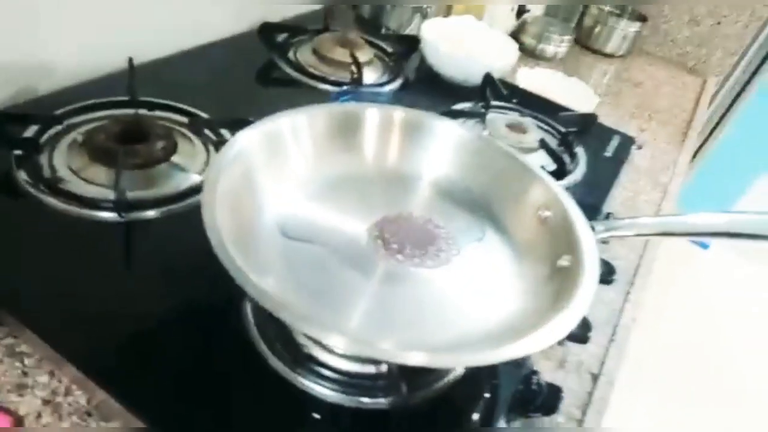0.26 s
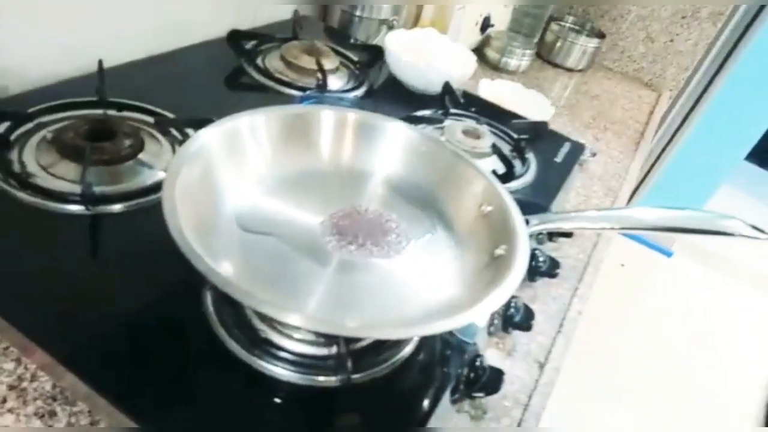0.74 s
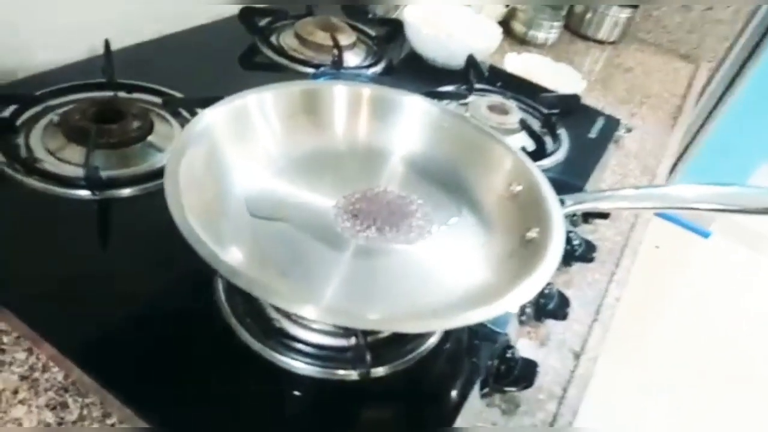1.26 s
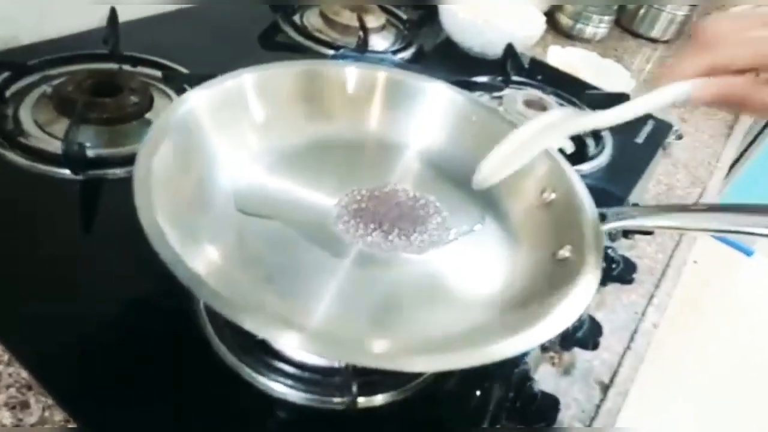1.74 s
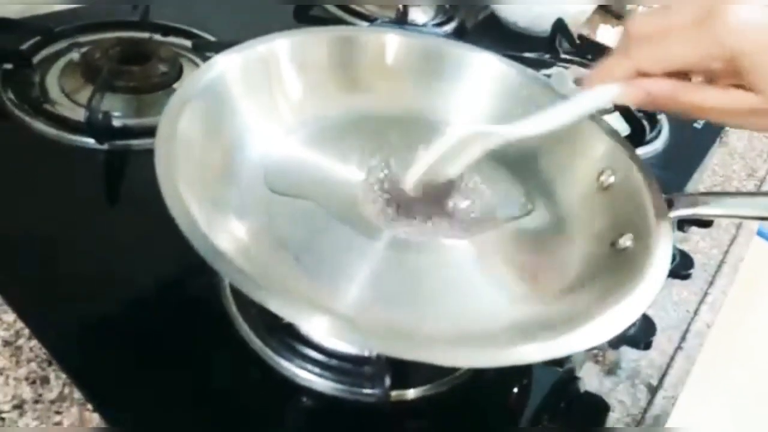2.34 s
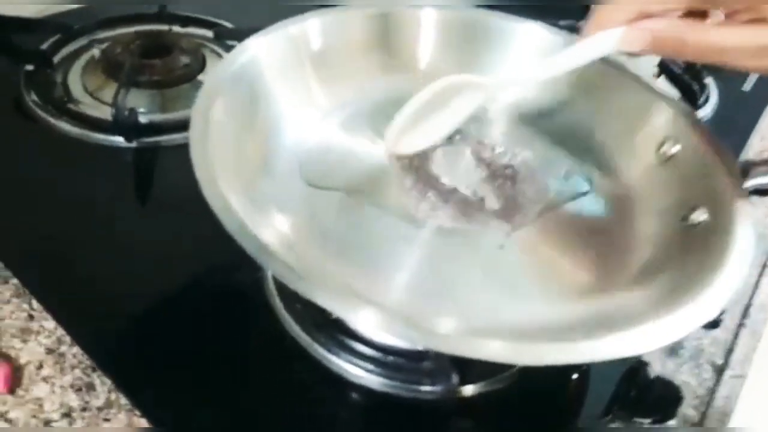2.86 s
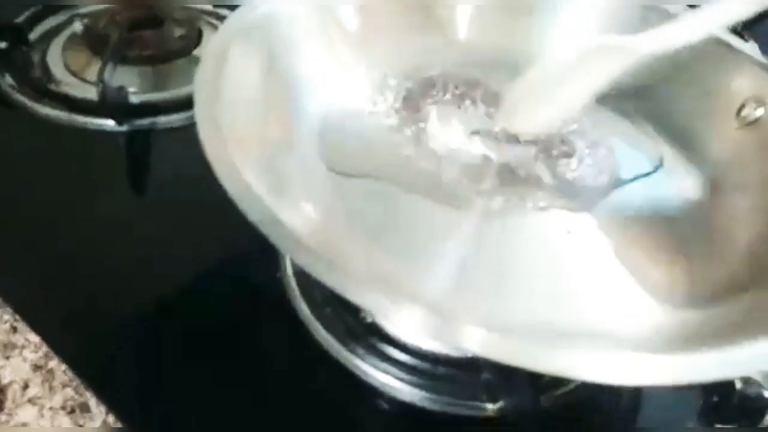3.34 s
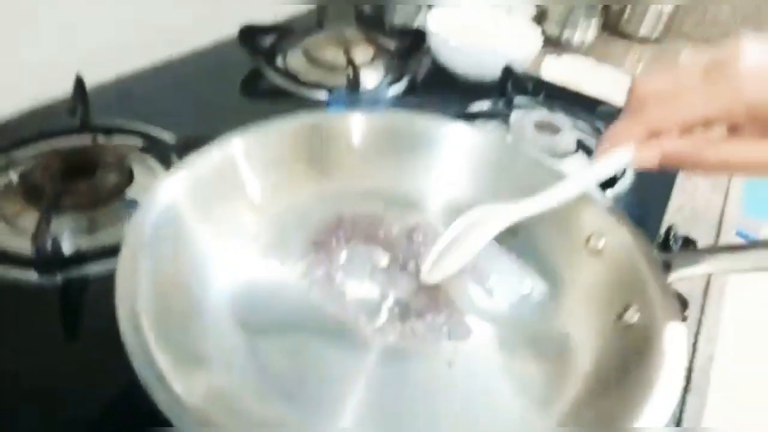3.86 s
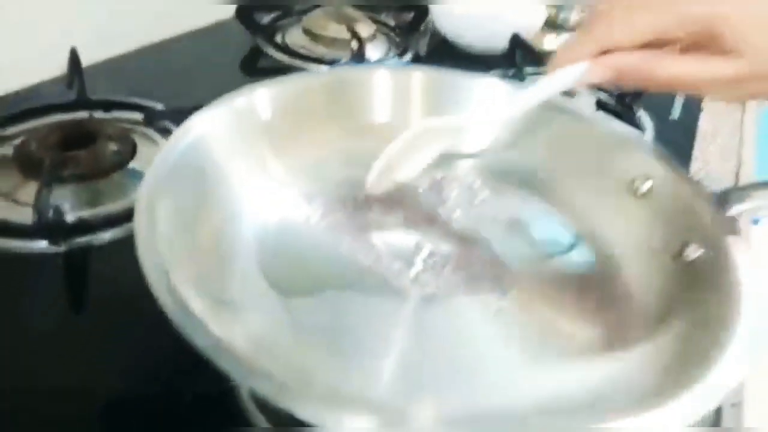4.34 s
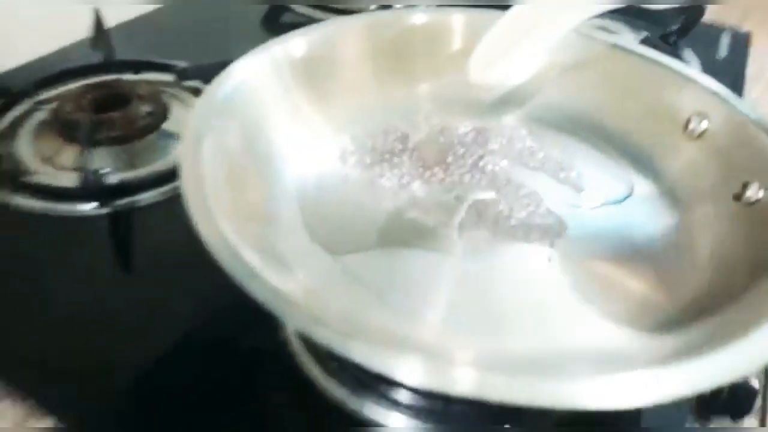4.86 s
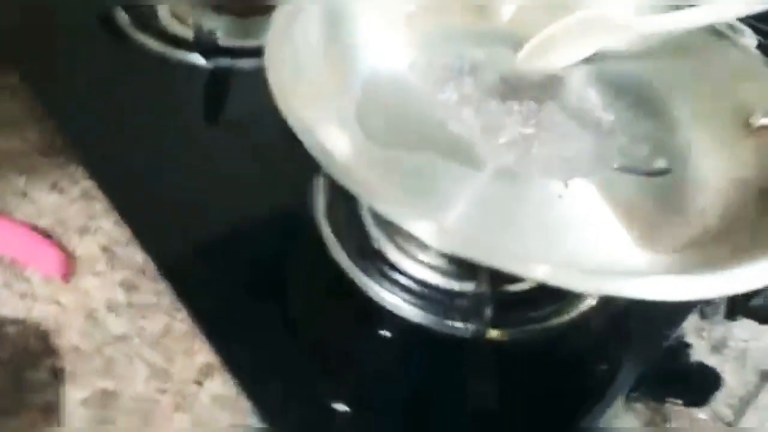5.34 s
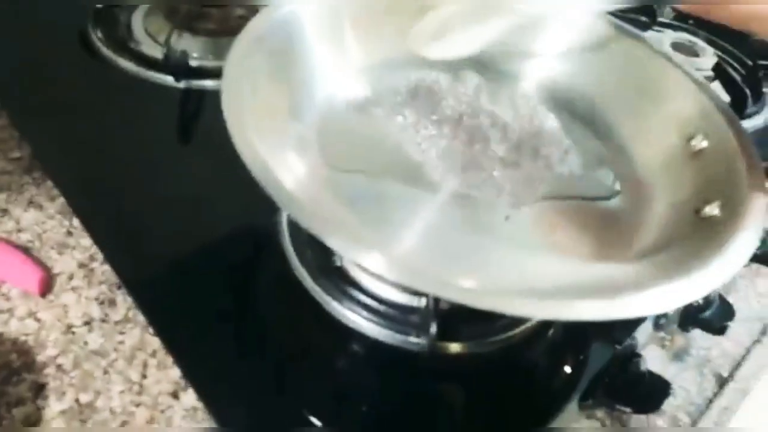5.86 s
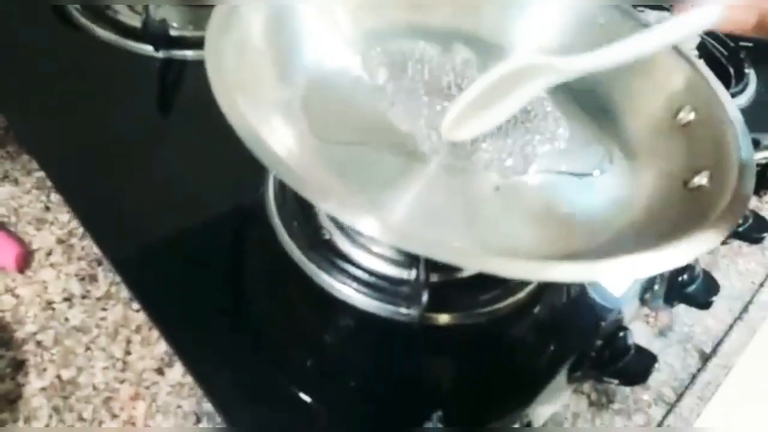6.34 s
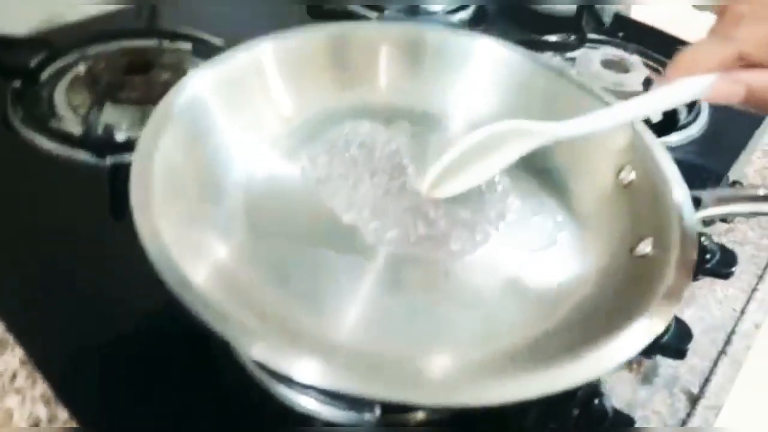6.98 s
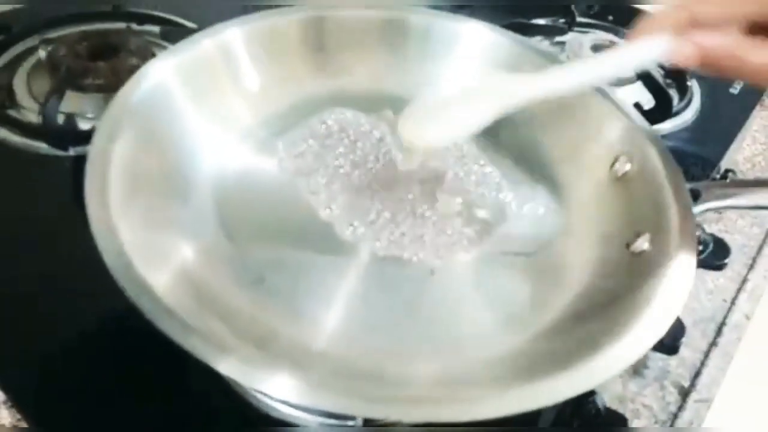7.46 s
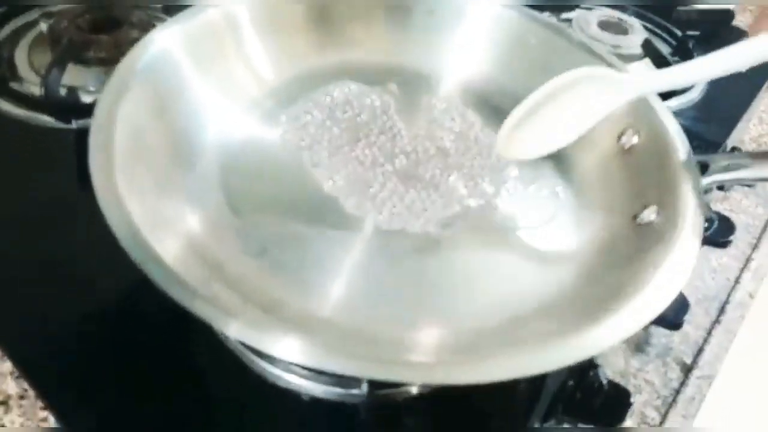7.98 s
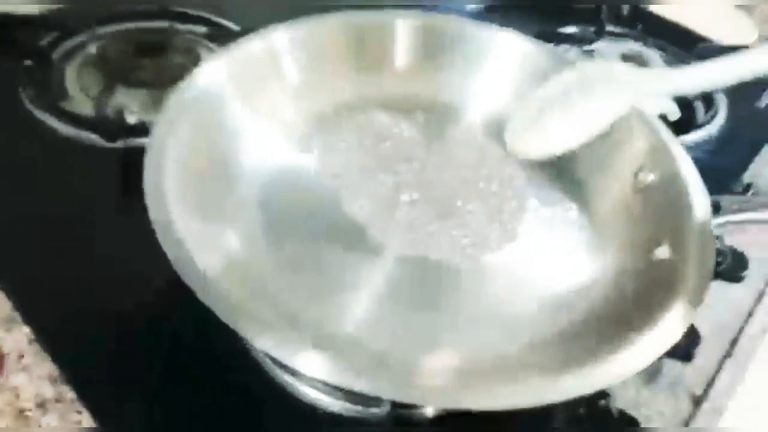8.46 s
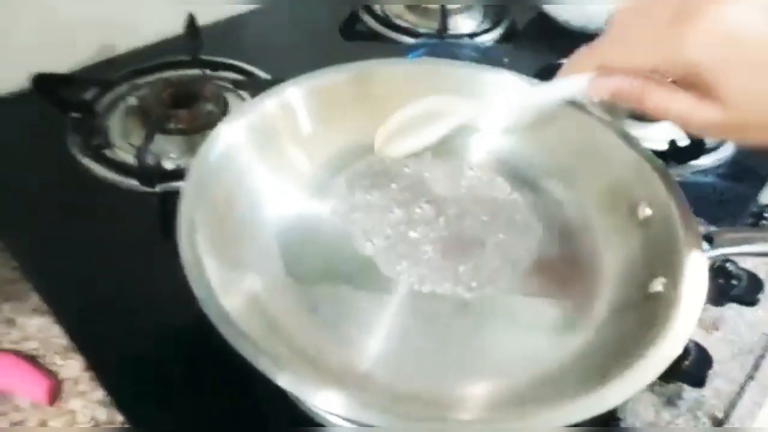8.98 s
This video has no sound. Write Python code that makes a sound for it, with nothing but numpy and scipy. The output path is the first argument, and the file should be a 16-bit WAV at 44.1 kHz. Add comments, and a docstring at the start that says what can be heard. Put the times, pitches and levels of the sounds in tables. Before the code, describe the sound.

Oil fizzes faintly in a steel pan over the low rumble of a gas flame. A utensil clatters briefly on the counter. Then a spoon starts stirring, with short ringing knocks and gritty scrapes, and the sizzle livens as seeds burst with sharp snaps. Toward the end the stirring stops and the frying settles. The pan is close to the microphone in a small, slightly echoing kitchen.

```python
"""Mustard seeds fizz and pop in a little hot oil in a steel pan, over a rumbling gas flame in a small
kitchen. Early on, a utensil clatters on the counter. From about 2 to 8 seconds a spoon stirs: it knocks
on the pan, drags over it and makes the oil crackle harder. From about 4 seconds, faint tones ring now
and then. Near the end a flying droplet ticks on the left microphone port (its sound opening), and a hand
shifts on the microphone with a soft rumble."""
import sys
import numpy as np
from scipy import signal
from scipy.fft import rfft, irfft
from scipy.io import wavfile
from scipy.ndimage import uniform_filter1d

SR = 44100
rng = np.random.default_rng(int(sys.argv[2]) if len(sys.argv) > 2 else 0)


def digitize_waveform(pressure):
    """Quantize a signal to 16-bit integers and store it at the path in sys.argv[1].

    Rows of a 2-D input are taken as channels; values are limited to [-1, 1].
    """
    field = np.atleast_2d(pressure).T
    bounded = np.clip(field, -1, 1)
    quanta = np.round(bounded * 32767).astype(np.int16)
    wavfile.write(sys.argv[1], SR, quanta)


N = 406161
TIME = np.arange(N) / SR


def from_db(db):
    """Turn decibels into a number to multiply a sound by."""
    return np.exp(np.asarray(db) * (np.log(10) / 20))


def rms_one(x):
    """Scale a signal so that its average level (rms) is 1."""
    return x / np.sqrt(np.mean(x ** 2) + 1e-20)


def unit_energy(x):
    """Scale each channel so that its squared samples add up to 1."""
    return x / np.sqrt(np.sum(x ** 2, axis=-1, keepdims=True))


def in_time(rows):
    """Join (time_s, value) points with straight lines."""
    return np.interp(TIME, *np.transpose(rows))


def sides(lean_db):
    """Share a sound between left and right; above 0 dB it leans left."""
    ratio = from_db(np.atleast_1d(lean_db))
    return np.array([ratio, np.ones_like(ratio)]) * np.sqrt(2 / (1 + ratio ** 2))


def from_the_right(x, lag_s):
    """A sound on the right reaches the left side a little later."""
    return np.array([np.interp(TIME - lag_s, TIME, x[0]), x[1]])


def dying(fade_s):
    """A fade-out. Everywhere here, fade_s is the time to fall by 60 dB."""
    return from_db(-60 * TIME[:max(int(fade_s * SR), 8)] / fade_s)


def swell(sound, rise_s):
    """Ease a sound in."""
    return sound * (1 - np.exp(-TIME[:sound.shape[-1]] / rise_s))


def add(track, start_s, sound):
    """Mix a sound into a track at the given time."""
    at = max(round(start_s * SR), 0)
    track[..., at:at + sound.shape[-1]] += sound[..., :N - at]


def drift(turns_per_s):
    """A curve that wanders at random, with a typical size of 1."""
    points = rng.standard_normal(int(N / SR * turns_per_s) + 2)
    return rms_one(np.interp(TIME * turns_per_s, np.arange(len(points)), points))


def noise(alike, size=N):
    """Stereo white noise; alike runs from 0 (unrelated sides) to 1 (the same on both)."""
    mid, side = rng.standard_normal((2, size))
    return (np.sqrt(1 + alike) * mid + np.sqrt(1 - alike) * np.array([side, -side])) / np.sqrt(2)


def through(x, response):
    """Play a sound through an object or room, given its response to one click."""
    convolve = signal.oaconvolve if x.shape[-1] == N else signal.fftconvolve
    return convolve(np.atleast_2d(x), np.atleast_2d(response), axes=-1)[:, :N]


def band(x, low_hz, high_hz):
    """Keep the part of a sound between two pitches."""
    return signal.sosfilt(signal.butter(2, [low_hz, high_hz], "band", fs=SR, output="sos"), x + 1e-18)


def colour(x, spectrum, size=4096):
    """Shape a sound's bass and treble to follow (pitch_hz, level_db) points."""
    hz, db = np.transpose(spectrum)
    grid_hz = np.maximum(np.arange(size // 2 + 1) * SR / size, 1)
    gains = from_db(np.interp(np.log(grid_hz), np.log(hz), db))
    # minimum phase: the filter never rings before the sound arrives
    cepstrum = irfft(np.log(gains))
    cepstrum[1:size // 2] *= 2
    cepstrum[size // 2 + 1:] = 0
    return through(x, unit_energy(irfft(np.exp(rfft(cepstrum)))))


def ringing(modes, spread):
    """An object's own notes (modes) fade away; spread puts left and right out of step."""
    longest_s = max(fade_s for _, _, fade_s in modes)
    out = np.zeros((2, int(longest_s * SR) + 8))
    for hz, db, fade_s in modes:
        fall = dying(fade_s)
        phase = 2 * np.pi * hz * TIME[:len(fall)] + spread * rng.normal(size=(2, 1))
        out[:, :len(fall)] += from_db(db) * fall * np.sin(phase)
    return out


def contact(fade_s, crack_db, crack_fade_s, rise_s):
    """The force of a blow: it builds up to a crack, then chatters away."""
    fall = dying(max(fade_s, crack_fade_s))
    crack = dying(crack_fade_s)
    fall[:len(crack)] += from_db(crack_db) * crack
    return swell(fall, rise_s) * noise(0.3, size=len(fall))


def kitchen(x):
    """The tiled room gives a blurred echo; the treble dies sooner."""
    tail = np.zeros((2, N))
    bands = [(61, 936, .5, .57), (1194, 2840, .52, .17), (2310, 16500, .37, 0)]
    for low_hz, high_hz, fade_s, alike in bands:
        fall = dying(fade_s)
        add(tail, .006, band(fall * noise(alike, size=len(fall)), low_hz, high_hz))
    return through(x, unit_energy(tail[:, :SR]))


# the flame's tone colour: pitch_hz, level_db
FLAME_COLOUR = [(20, -14), (50, -10.5), (105, 4), (170, 1.5), (260, -4.5), (400, -9.5), (750, -11),
                (1100, -15), (3000, -30.5)]
# how loud the flame is: time_s, level_db
FLAME_LEVEL = [(0, -63.5), (1.9, -62), (2.8, -57.5), (6.5, -59.5), (7.6, -61), (8.5, -60.5), (8.75, -64),
               (9.2, -61.5)]
def flame():
    """The gas burns with a low, flickering rumble."""
    return colour(noise(0.71), FLAME_COLOUR) * from_db(in_time(FLAME_LEVEL) + 1.5 * drift(12))


# how loud the hand's rumble is: time_s, level_db
HAND_LEVEL = [(8.5, -80), (8.65, -56), (8.85, -59), (9.0, -86)]
def hand():
    """A hand shifts on the microphone and makes it rumble."""
    return rms_one(band(noise(0.92), 41, 147)) * from_db(in_time(HAND_LEVEL))


# faint ringing tones: start_s, pitch_hz, level_db, fade_s
FAINT_TONES = [(3.905, 725, -50.5, 1.4), (4.67, 721, -41.5, 1.3), (5.541, 1054, -52.5, 1.9),
               (5.69, 1360, -60, 1.1), (6.252, 1073, -51, 0.97), (7.2, 1343, -48.5, 0.96),
               (8.04, 818, -48.5, 0.78)]
def tones():
    """Faint tones ring on, waver and fade."""
    out = np.zeros((2, N))
    for start_s, hz, db, fade_s in FAINT_TONES:
        add(out, start_s, swell(ringing([(hz, db, fade_s)], spread=.5), rise_s=.02))
    return out * (.8 + .45 * drift(28))


# the notes of the microphone port: pitch_hz, level_db, fade_s
PORT_MODES = [(3080, -8, 0.012), (3920, -0.5, 0.0024), (5600, 7, 0.0031)]
def droplet(start_s=8.5332):
    """A drop hits the left port, which rings so briefly that it makes one dry tick."""
    out = np.zeros((2, N))
    add(out, start_s, from_db(-13.5) * ringing(PORT_MODES, spread=0.13) * sides(24))
    return band(out, 1550, 12500)


# the low notes of the stove under the pan: pitch_hz, level_db, fade_s
STOVE_MODES = [(94, -4, 0.1), (138.4, -12.5, 0.43), (169, -10.5, 0.15), (224, 3.5, 0.042),
               (277.5, 4.5, 0.067), (329.5, 0, 0.096)]
def stove(force):
    """Blows travel into the stove, which thuds almost alike on both sides."""
    thud = swell(ringing(STOVE_MODES, spread=0.143), rise_s=0.006)
    return through(force.mean(axis=0), unit_energy(thud))


# each time the utensil touches the counter: start_s, level_db, treble_db, chime_db
BOUNCES = [(0.5907, -13, 3.5, -44), (0.5967, -13.5, 2, -57), (0.602, -14.5, 0, -61), (0.6101, -16, -1, -55),
           (0.6186, -40, 3, -60), (0.659, -24, 16.5, -39), (0.661, -32, 10, -42), (.677, -30, 4, -54),
           (0.68, -28, 2, -44.5), (0.802, -8.5, -1, -33), (0.806, -7.5, 8.5, -50), (0.817, -15, 1, -45),
           (.8245, -9, -1, -52), (0.829, -12.5, 4, -50), (0.8377, -11.5, -11, -45), (.844, -13.5, -8, -55),
           (1.677, -34.5, -6, -55)]
# the utensil's notes: pitch_hz, level_db, fade_s
UTENSIL_MODES = [(225.1, -4.5, 0.44), (553, -0.5, 0.12), (877, -5.5, 0.6), (1200, 1, 0.22), (1454, 4, 0.18),
                 (1798, -17, 0.58), (1927, -6, 0.25), (2115, 5, 0.09), (2350, -9, 0.19), (2331, 6, 0.12),
                 (2772, -3, 0.28), (3728, -2.5, 0.26), (4920, 5, 0.034), (6940, 1, 0.041)]
# tone colours of the clatter's body and its bright top: pitch_hz, level_db
BODY_COLOUR = [(60, -25), (130, -11), (220, -14), (380, -17), (620, -1.5), (1400, 2), (2200, 2.5),
               (2900, -4.5), (3500, -15), (5000, -14), (9000, -37)]
TOP_COLOUR = [(2000, -24), (3700, 19), (5000, 5), (6700, 9), (8200, -9.5), (11000, -6), (13500, -43)]
def clatter(chime_above_hz=3200):
    """Each bounce cracks and rings the hollow utensil; its tip chimes and the stove thuds along."""
    blows, treble, taps, tips = np.zeros((4, 2, N))
    for start_s, db, treble_db, chime_db in BOUNCES:
        force = contact(.027, crack_db=6, crack_fade_s=0.007, rise_s=0.0005)
        blow = from_db(db + 13.5) * unit_energy(force)
        add(blows, start_s - .0005, blow)
        add(treble, start_s - .0005, from_db(treble_db - 8.5) * blow)
        add(taps, start_s, from_db([db]))
        add(tips, start_s, from_db([chime_db]))
    body_modes = [mode for mode in UTENSIL_MODES if mode[0] < chime_above_hz]
    tip_modes = [mode for mode in UTENSIL_MODES if mode[0] >= chime_above_hz]
    ring = from_db(-28) * through(taps, ringing(body_modes, spread=0.1))
    chime = through(tips, ringing(tip_modes, spread=0.72))
    body = from_the_right(colour(blows, BODY_COLOUR) + ring, lag_s=0.00036)
    return body + colour(treble, TOP_COLOUR) + chime + from_db(-17.5) * stove(blows)


def touched(modes):
    """Each place the spoon touches changes the pitch and strength of the pan's notes a little."""
    return [(hz * (1 + .008 * rng.normal()), db + 2.5 * rng.normal(), fade_s)
            for hz, db, fade_s in modes]


# the pan's lowest notes, the main one first: pitch_hz, level_db, fade_s
BOTTOM_MODES = [(885, 0, 0.095), (855, -6, 0.055), (935, -7, 0.05), (1575, -20, 0.05)]
def bottom_knock(pitch_hz):
    """The pan's bottom rings; the pressing spoon shifts its main note to pitch_hz."""
    shifted = [(hz * pitch_hz / BOTTOM_MODES[0][0], db, fade_s) for hz, db, fade_s in BOTTOM_MODES]
    return swell(ringing(shifted, spread=0.24), rise_s=0.003)


def bottom_hum(force):
    """A drag keeps the pan's bottom humming."""
    hum = through(force.mean(axis=0), ringing(touched(BOTTOM_MODES), spread=0.81))
    return np.sqrt(force.shape[1]) * unit_energy(hum)


# the pan's higher notes: pitch_hz, level_db, fade_s
SHELL_MODES = [(1579, 5, 0.051), (1740, -8, 0.024), (2440, 2.5, 0.029), (3032, -1, 0.055),
               (3680, 2.5, 0.14), (4106, 11.5, 0.031), (5160, 9, 0.032), (5680, 5.5, 0.074),
               (6610, 11, 0.036)]
def shell(force, ring_db, minor_db, minor_fade_s, size=6000):
    """The pan's steel shell passes on the contact itself, its main notes and a crowd of minor ones."""
    response = np.zeros((2, size))
    response[:, 0] = 1
    main_notes = unit_energy(ringing(touched(SHELL_MODES), spread=1.0))
    add(response, 0, from_db(ring_db) * main_notes[:, :size])
    fall = dying(minor_fade_s)[:size]
    add(response, 0, from_db(minor_db) * unit_energy(fall * noise(0.066, size=len(fall))))
    return through(force, unit_energy(response))


def drag(length_s, rise_db, slips_per_s=500, spread_db=2.0, grit=0.93):
    """The spoon's rim sticks and slips as the hand's pressure changes: jerks with puffs of fine grit."""
    size = max(int(length_s * SR), 256)
    slips = rng.integers(0, size, int(length_s * slips_per_s) + 4)
    jerks = np.zeros(size)
    jerks[slips] = from_db(spread_db * np.clip(rng.normal(size=len(slips)), -2, 1.5))
    puffs = signal.lfilter([1], [1, -np.exp(-1 / (0.0038 * SR))], jerks)
    force = rms_one(jerks - jerks.mean()) + grit * rms_one(puffs) * noise(0.42, size=size)
    pressure = from_db(np.linspace(0, rise_db, size)) * signal.windows.tukey(size, .3)
    return rms_one(force * pressure)


# the spoon knocks or catches on the pan: start_s, pitch_hz, bottom_db, clack_db, tick_db
SPOON_KNOCKS = [(2.353, 864, -16.5, -30.5, -36.5), (2.614, 877, -21.5, -23, -20.5),
                (2.861, 851, -11, -41.5, -37.5), (2.949, 885, -19.5, -38, -55),
                (3.005, 891, -11, -25.5, -25.5), (3.186, 860, -27, -39, -39), (3.476, 891, -9, -23, -23.5),
                (3.512, 976, -19, -32, -38), (3.687, 877, -23.5, -37, -56), (3.901, 898, -13.5, -20, -29),
                (4.264, 880, -24, -44, -48), (4.281, 884, -28.5, -57, -28.5), (4.314, 868, -25, -59, -61),
                (4.666, 850, -20, -21.5, -21.5), (5.678, 861, -31, -23.5, -19),
                (5.779, 894, -21.5, -35, -52), (5.979, 860, -28.5, -43, -48), (6.035, 880, -19, -40, -57),
                (6.745, 877, -21.5, -46.5, -44), (7.0741, 893, -34, -24.5, -22),
                (7.124, 898, -18, -29, -50), (7.148, 947, -20, -30, -48), (7.17, 892, -13.5, -44, -50),
                (7.775, 848, -38.5, -70, -62)]
# the spoon drags over the pan: start_s, end_s, bottom_db, rasp_db, hiss_db, pressure_rise_db
SPOON_DRAGS = [(2.268, 2.347, -41.5, -40, -48, -5), (2.632, 2.723, -31, -29, -36, 11),
               (2.937, 3.08, -38, -44, -42.5, -5), (3.188, 3.28, -53, -61, -44, 3),
               (3.399, 3.529, -32, -41.5, -41, 7), (3.545, 3.72, -51, -48, -41, 16),
               (3.927, 4.09, -52, -54, -39.5, -2), (4.273, 4.342, -37, -46, -40, 4),
               (4.674, 4.734, -35, -38, -38.5, 1), (4.785, 4.977, -54.5, -57, -51, 23),
               (5.691, 5.813, -36, -34.5, -36.5, 8.5), (5.981, 6.076, -39.5, -45.5, -44, 10),
               (6.397, 6.482, -50, -48, -42.5, 3), (7.085, 7.192, -39.5, -28.5, -35.5, -1),
               (7.758, 7.822, -45, -53, -41.5, 1)]
# tone colours of the shell's rasp and its hiss: pitch_hz, level_db
RASP_COLOUR = [(200, -17), (450, -15), (1100, 0.5), (1600, 4), (3000, 2), (4000, -7), (5200, -4.5),
               (9000, -41)]
HISS_COLOUR = [(2000, -14.5), (3600, -0.5), (4800, 1), (6600, 5), (7900, -9), (10500, -12), (13500, -32)]
def spoon():
    """Knocks and gritty drags shake the pan: its bottom hums, its shell clacks and hisses."""
    bottom, rasp, hiss = np.zeros((3, 2, N))
    skids = []
    for start_s, hz, bottom_db, clack_db, tick_db in SPOON_KNOCKS:
        add(bottom, start_s - .002, from_db(bottom_db - 3) * bottom_knock(hz))
        blow = contact(.055, crack_db=-3, crack_fade_s=0.011, rise_s=0.0006)
        clack = shell(blow, ring_db=-1, minor_db=1, minor_fade_s=.05)
        add(rasp, start_s - .001, from_db(clack_db + 1) * clack)
        snap = contact(0.054, crack_db=16.5, crack_fade_s=0.0098, rise_s=0.00085)
        tick = shell(snap, ring_db=-8, minor_db=-3.5, minor_fade_s=0.042)
        add(hiss, start_s - .0005, from_db(tick_db - 5) * tick)
        # after each knock the spoon skids: a short, quiet drag
        skids.append((start_s + .004, start_s + .04, clack_db - 16.5, clack_db - 11.5, clack_db - 24.5, 0))
    for start_s, end_s, bottom_db, rasp_db, hiss_db, rise_db in SPOON_DRAGS + skids:
        force = drag(end_s - start_s + .01, rise_db)
        add(bottom, start_s, from_db(bottom_db - 3.5) * bottom_hum(force))
        add(rasp, start_s, from_db(rasp_db - 5) * shell(force, ring_db=10, minor_db=4, minor_fade_s=.05))
        add(hiss, start_s, from_db(hiss_db) * shell(force, ring_db=0, minor_db=12, minor_fade_s=.03))
    steel = colour(rasp, RASP_COLOUR) * sides(1) + colour(hiss, HISS_COLOUR) * sides(-6)
    return band(bottom, 811, 1730) + from_the_right(steel, lag_s=0.00019) + from_db(-17) * stove(rasp)


def sputter(hz):
    """A lumpy spray of oil dies away around one pitch."""
    fall = dying(fade_s=.07)
    wobble = rms_one(uniform_filter1d(rng.standard_normal(len(fall)), size=64))
    spray = from_db(3.5 * wobble) * noise(0, size=len(fall))
    return fall * rms_one(band(spray, 0.85 * hz, 1.15 * hz))


def spits(sizzle_db, count=90, from_s=2.9, until_s=6.4):
    """Small pockets of steam spurt at random from the stirred oil, loudest when it is lively."""
    out = np.zeros((2, N))
    starts_s = rng.uniform(from_s, until_s, count)
    strengths = rng.exponential(1, count)
    pitches_hz = rng.uniform(2960, 8550, count)
    for start_s, strength, hz in zip(starts_s, strengths, pitches_hz):
        db = sizzle_db[int(start_s * SR)] + 15.5 + 1.6 * min(strength, 3)
        add(out, start_s, from_db(db) * sputter(hz))
    return out


def bubbles(per_s, spread_db):
    """Tiny bursts at random moments, each with its own strength on the left and right."""
    born = np.flatnonzero(rng.random(N) < per_s / SR)
    strengths = from_db(spread_db * np.minimum(rng.exponential(1, len(born)), 4.5))
    out = np.zeros((2, N))
    out[:, born] = strengths * rng.normal(size=(2, len(born)))
    return rms_one(out)


# how lively the oil is between drags: time_s, level_db
SIZZLE_LEVEL = [(0, -74.5), (1.25, -64.5), (1.95, -64), (2.3, -58.5), (2.9, -54), (3.3, -58.5), (4.5, -59),
                (5.25, -62), (5.6, -55.5), (6.25, -64), (6.6, -62.5), (7.7, -64), (8.8, -66), (9.2, -63)]
def liveliness(flare_db=-16.5, settle_s=0.084):
    """The sizzle's level in dB: each drag spreads oil over hot steel, so it flares and then settles."""
    power = from_db(in_time(SIZZLE_LEVEL)) ** 2
    for start_s, end_s, _, _, hiss_db, _ in SPOON_DRAGS:
        build = np.clip((TIME - start_s) / (end_s - start_s), 0, 1)
        settle = np.exp(-np.clip(TIME - end_s, 0, 2) / settle_s)
        power += (from_db(hiss_db + flare_db) * build * settle) ** 2
    return 10 * np.log10(power)


# tone colours of the fine fizz and the coarse crackle: pitch_hz, level_db
FIZZ_COLOUR = [(500, -25.5), (1000, -17.5), (2200, -8.5), (4200, -14), (5400, -4), (6600, -.5), (7500, -9),
               (8200, -14.5), (10500, -13), (12900, -26), (13500, -49)]
CRACKLE_COLOUR = [(600, -16), (1500, -25), (3000, -3), (4500, -0.5), (6400, 1), (7800, -17.5),
                  (10500, -3.5), (13500, -24)]
# the bubbles get finer as the oil heats: time_s, fine_share (0 to 1)
FINE_BUBBLES = [(0, 0.1), (1.8, 0.11), (2.8, 0.37), (6, 0.32), (7.8, 1.0), (9.2, 1)]
# where the sizzle is heard: time_s, lean_left_db
SIZZLE_LEAN = [(0, -1.5), (2.5, -2.5), (5, -2.5), (7, -3), (8.2, -7.5), (9.2, -5.5)]
def frying():
    """Steam bubbles fizz in the oil; coarser crackle joins in as it is stirred."""
    sizzle_db = liveliness()
    bright = colour(bubbles(per_s=14000, spread_db=-0.5), FIZZ_COLOUR) * from_db(sizzle_db + 11.5)
    dull = signal.sosfilt(signal.butter(2, 8000, fs=SR, output="sos"), bright)[:, ::-1]
    dull = signal.sosfilt(signal.butter(2, 8000, fs=SR, output="sos"), dull)[:, ::-1]
    fine_share = in_time(FINE_BUBBLES)
    fizz = fine_share * bright + (1 - fine_share) * dull
    # crackle falls away faster than the fizz when the oil settles
    crackle_db = sizzle_db + np.minimum(sizzle_db + 58, 0) + 2.9 * drift(25) - 1
    bursts = bubbles(per_s=500, spread_db=7) * from_db(crackle_db)
    crackle = colour(bursts, CRACKLE_COLOUR) + spits(sizzle_db)
    lean_db = in_time(SIZZLE_LEAN)
    return fizz * sides(lean_db) + crackle * sides(0.81 * lean_db)


# the loudest seeds bursting: start_s, level_db, pitch_hz, lean_left_db
SEED_POPS = [(.5597, -42, 6300, -10), (2.039, -37, 7100, -15), (2.2425, -39, 6040, -7),
             (2.518, -36.5, 5160, -10), (2.916, -24, 6380, -24), (3.1464, -24, 5940, -17),
             (3.1833, -16.5, 5680, -19), (3.595, -23.5, 6560, -18), (3.653, -25, 6000, -13),
             (3.71, -18.5, 6500, -21), (3.8735, -16, 3640, -9), (4.023, -29, 5700, -11),
             (4.0875, -23.5, 4300, -10), (4.132, -16.5, 6160, -5), (4.5025, -23.5, 5100, -3),
             (4.5464, -24.5, 6960, -24), (4.7277, -17.5, 5900, -13), (4.783, -24, 5260, -6),
             (4.844, -24.5, 6600, -15), (4.879, -26, 5800, -5), (4.955, -27.5, 5860, -15),
             (5.097, -34.5, 3600, 15), (5.1139, -22.5, 6160, -10), (5.2014, -29, 6860, -22),
             (5.212, -35, 3890, -3), (5.2206, -37, 5570, -7), (5.2435, -32, 6700, -16),
             (5.2673, -19.5, 6630, -6), (5.39, -27, 6900, -14), (5.63, -17, 6610, -3),
             (5.969, -20.5, 5980, -10), (6.1984, -33.5, 6120, -7), (6.3052, -29.5, 6640, -10),
             (6.3937, -28.5, 5010, -6.5), (6.4113, -27.5, 6200, -9), (6.4244, -24, 6650, -17),
             (6.5712, -32, 8900, -29), (6.6575, -38, 5630, 17), (6.669, -38, 6860, -6),
             (7.0514, -23.5, 3770, -20), (8.4687, -31.5, 6500, 4), (8.582, -23, 6330, -8)]
# tone colour of a seed's snap: pitch_hz, level_db
SNAP_COLOUR = [(600, -11.5), (1800, -5.5), (3500, -3.5), (6400, 9), (8000, -11), (11000, -4.5),
               (13500, -19.5)]
def pops():
    """A seed splits with a hard snap and a very short ring, and spatters a little oil."""
    snaps, rings = np.zeros((2, 2, N))
    for start_s, db, hz, lean_db in SEED_POPS:
        gain = from_db(db) * sides(lean_db)
        snap = unit_energy(contact(.03, crack_db=28, crack_fade_s=.005, rise_s=.0002))
        add(snaps, start_s, gain * from_db(11) * snap)
        add(rings, start_s + 0.0023, from_db(db - 12) * sides(0.52 * lean_db) * sputter(hz))
        seed_modes = [(hz, 0, .008), (hz * rng.uniform(1.31, 1.7), -11, .007)]
        add(rings, start_s, gain * ringing(seed_modes, spread=.7))
    return colour(snaps, SNAP_COLOUR) + band(rings, 3350, 8600)


def scene():
    """The pan is close, the clatter further off with more echo, the flame underneath."""
    stirring, seeds, utensil = spoon(), pops(), clatter()
    rumble = flame() + hand()
    echo = kitchen(from_db(-8.5) * (stirring + seeds) + from_db(-5) * utensil)
    return rumble + echo + utensil + stirring + frying() + seeds + tones() + droplet()


def record(dry):
    """Cut the highest treble steeply."""
    cutoff_hz = 13300
    return signal.sosfilt(signal.ellip(8, .5, 70, cutoff_hz, fs=SR, output="sos"), dry)


dry = scene()
out = record(dry)
digitize_waveform(out)
```